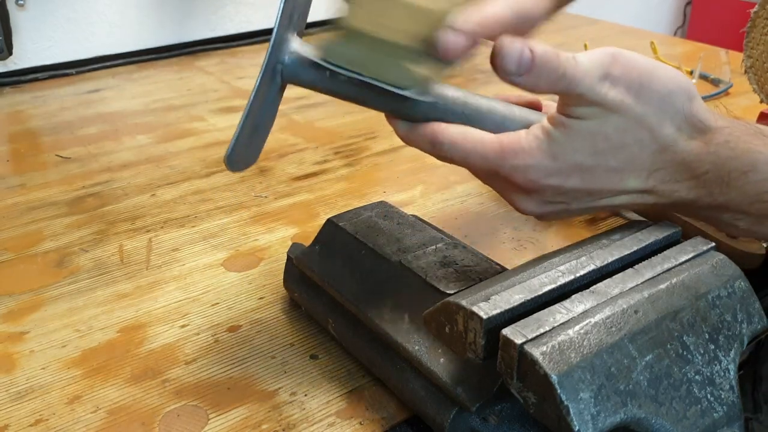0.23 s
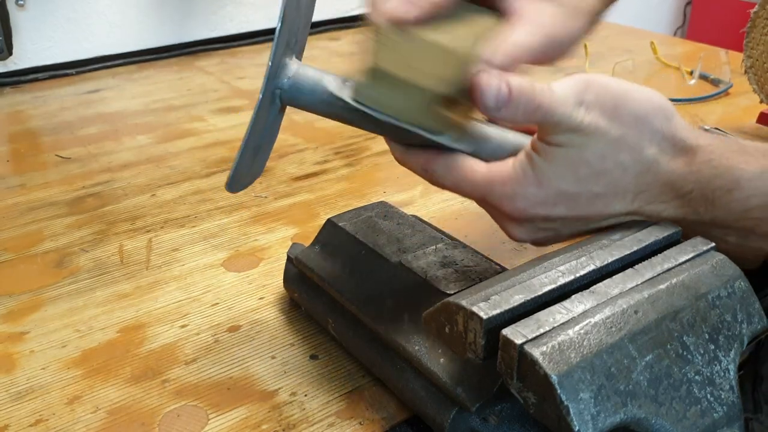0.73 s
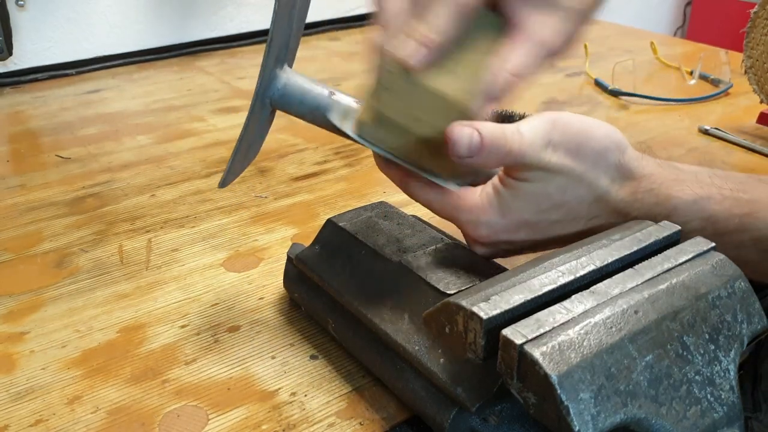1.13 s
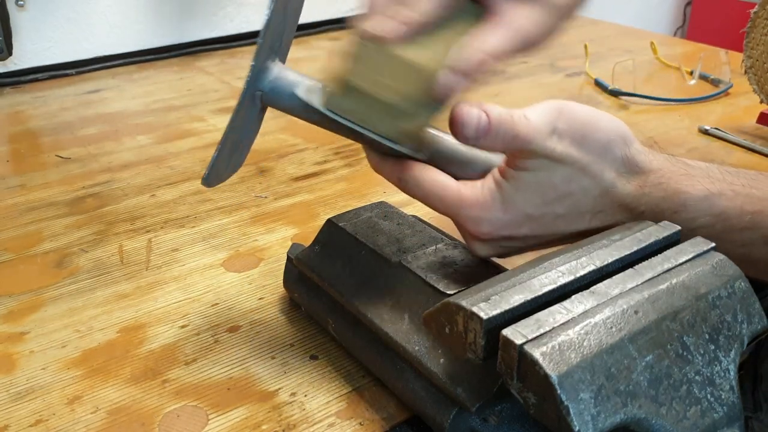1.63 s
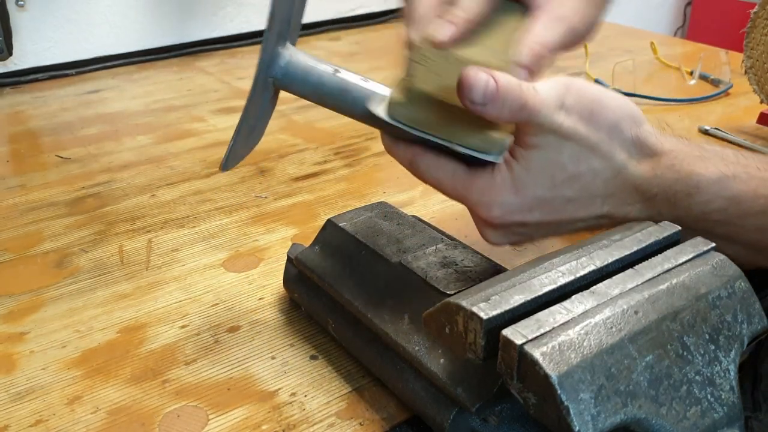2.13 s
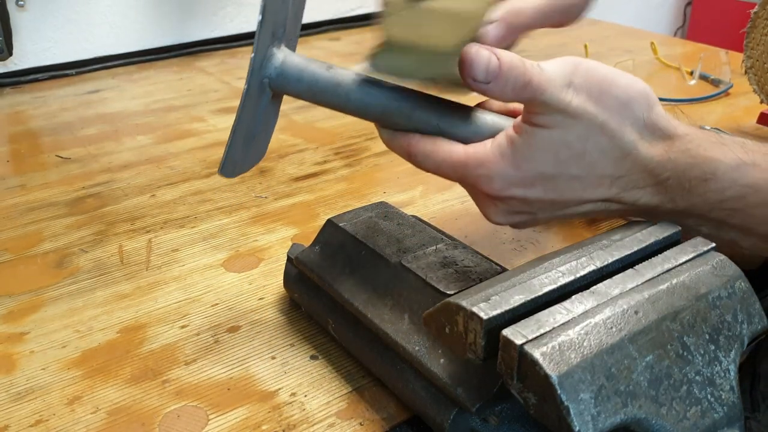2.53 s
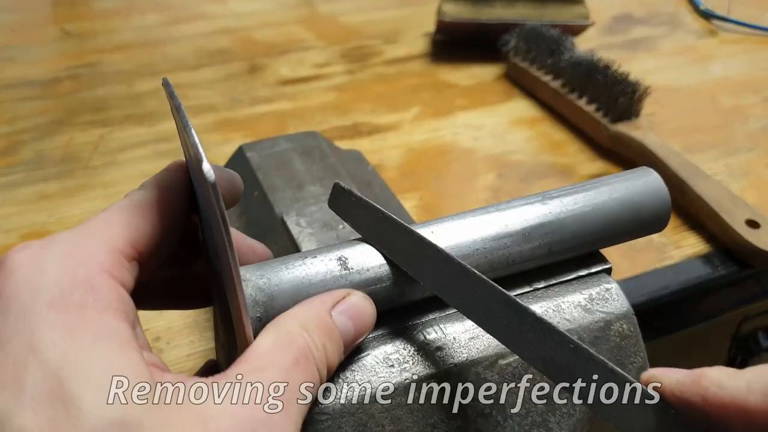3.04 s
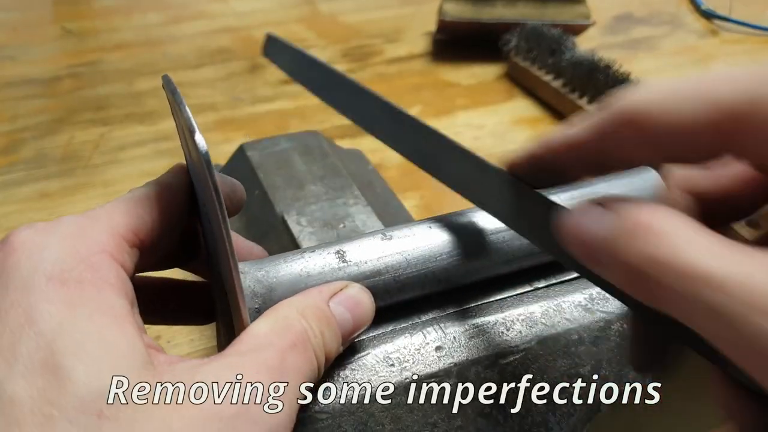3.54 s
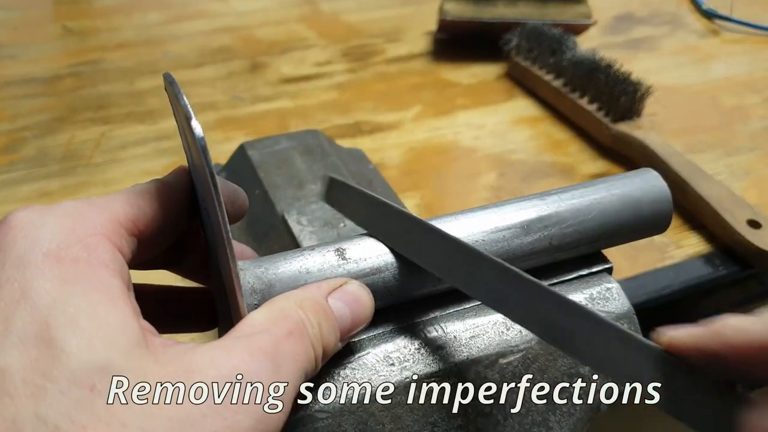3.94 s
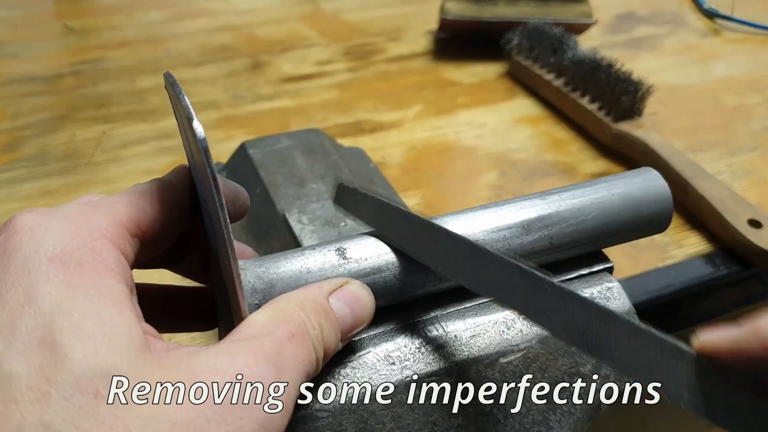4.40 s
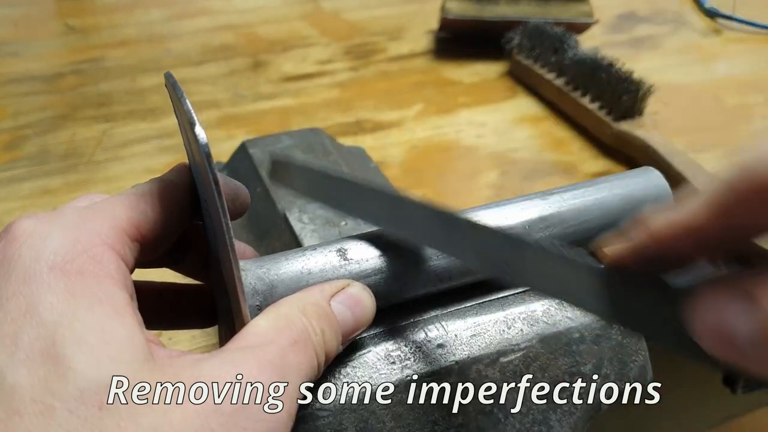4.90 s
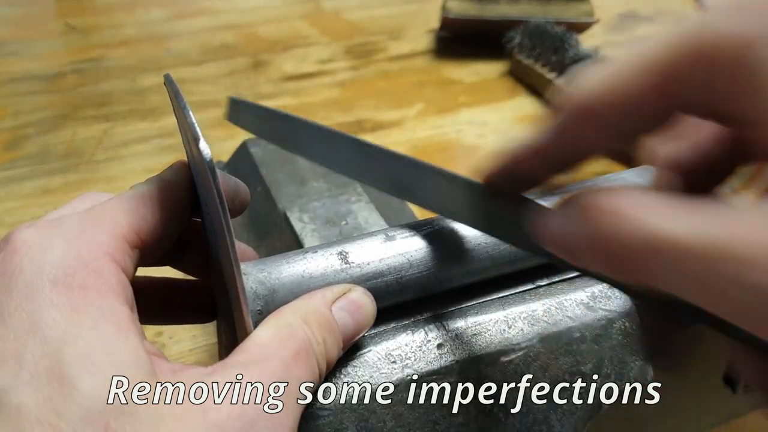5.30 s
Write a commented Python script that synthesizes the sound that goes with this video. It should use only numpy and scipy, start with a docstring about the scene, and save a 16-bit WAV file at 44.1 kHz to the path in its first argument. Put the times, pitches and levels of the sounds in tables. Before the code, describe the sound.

Close up in a small workshop, fast, even sanding strokes scratch along a steel tube with a bright, gritty hiss. After a very short pause, a hand file taps down on the tube and scrapes across it four times. The pushes have a metallic rasp and a short low hum, and irregular knocks between them carry through the vice and the bench.

```python
"""Quick to-and-fro sanding on a hand-held steel tube, then a file knocking, rasping and humming on it.
Grit on the sanding block strikes the tube in countless small impacts, while the hand damps its modes.
Then the tube lies on a vice: the file's teeth and blows force the steel, the vice and the bench into
vibration. The file's own low bending note hums late in a push and rings briefly after the opening and
closing knocks. A small workshop reverberates."""
import sys
import numpy as np
from scipy import signal
from scipy.fft import rfft, irfft, next_fast_len
from scipy.io import wavfile
from scipy.ndimage import uniform_filter1d

SR = 44100
rng = np.random.default_rng(int(sys.argv[2]) if len(sys.argv) > 2 else 0)


def put_to_file(sound):
    """Save the sound as 16-bit audio at rate SR, in the file named by the first command-line argument."""
    columns = np.atleast_2d(sound).T  # one column per channel
    safe = np.clip(columns, -1, 1)
    whole_steps = np.round(safe * 32767)
    wavfile.write(sys.argv[1], SR, whole_steps.astype(np.int16))


N = 245195
TIME_S = np.arange(N) / SR
FFT_SIZE = next_fast_len(N + SR)
HZ = np.fft.rfftfreq(FFT_SIZE, 1 / SR)

# The file lands, knocks or snags: start_s, bench_db, steel_above_bench_db, thud_hz
FILE_KNOCKS = [(2.738, -61.5, -23, 484), (2.782, -42, -35, 700), (2.853, -43.5, -19.5, 1440),
               (2.906, -47, -17, 1220), (3.113, -37, -6.5, 1320), (3.716, -42.5, -13, 1330),
               (3.77, -38.5, 4, 1250), (3.941, -45.5, -3.5, 760), (4.054, -43.5, -15, 1450),
               (4.151, -38, 6.5, 1330), (4.481, -40, -1, 1440), (4.717, -34.5, 6, 1215),
               (5.011, -36, 9.5, 1000), (5.095, -36.5, -12, 785), (5.187, -36, -11, 1600),
               (5.452, -34.5, 8.5, 1020)]


def gain_of(db):
    """Amplitude ratio of a level in decibels."""
    return 10 ** (np.asarray(db) / 20)


def unit_rms(x):
    """Normalisation to a mean power of 1."""
    return x / np.sqrt(np.mean(abs(x) ** 2) + 1e-20)


def curve_at(points, hz):
    """Interpolation along a logarithmic frequency axis."""
    point_hz, value = np.transpose(points)
    return np.interp(np.log(hz + 1), np.log(point_hz + 1), value)


def wander(cutoff_hz):
    """Low-passed noise: a slow random fluctuation of rms 1."""
    return unit_rms(signal.lfilter(*signal.butter(2, cutoff_hz / SR * 2), rng.standard_normal(N)))


def modal_response(modes, floor):
    """Resonance: modal peaks add in power over a broad floor, in a normalised minimum-phase response."""
    hz = abs(np.fft.fftfreq(16384, 1 / SR))
    power = gain_of(2 * curve_at(floor, hz))
    for centre_hz, width_hz, db in modes:
        power = power + gain_of(2 * db) / (1 + (2 * (hz - centre_hz) / width_hz) ** 2) ** 2
    log_spectrum = np.conj(signal.hilbert(np.log(power + 1e-12) / 2))
    ring = np.fft.ifft(np.exp(log_spectrum)).real
    return unit_rms(rfft(ring[:8192], FFT_SIZE))


def stereo_spectra(pair, correlation):
    """Partial coherence: two independent signals mix into correlated left and right spectra."""
    left, other = rfft(pair, FFT_SIZE)
    shared = np.clip(curve_at(correlation, HZ), 0, 1)
    return np.array([left, shared * left + np.sqrt(1 - shared ** 2) * other])


def micro_impacts(per_s, spread_db):
    """Shot noise: two independent streams of random clicks, a few much larger than the rest."""
    size = gain_of(spread_db * np.minimum(rng.exponential(1, (2, N)), 5))
    return unit_rms(size * rng.standard_normal((2, N)) * (rng.random((2, N)) < per_s / SR))


def moving_contact(x, depth_db, frames, bins):
    """Excitation depends on position: as the contact moves, patches of the spectrum swell and sink."""
    hz, _, spectra = signal.stft(x, SR, nperseg=512, noverlap=384)
    patches = rng.standard_normal(spectra.shape[1:])
    for _ in range(2):
        patches = uniform_filter1d(uniform_filter1d(patches, frames, axis=1), bins, axis=0)
    patches = unit_rms(patches) * np.minimum(hz / 600, 1)[:, None]  # the bass stays even
    coloured = signal.istft(spectra * gain_of(depth_db * patches), nperseg=512, noverlap=384)[1]
    return unit_rms(coloured[:, :N])


def force_pulses(times_s, levels_db, decay_s, rise_s=0.00058):
    """Impulsive excitation: envelopes of force that rise steeply and decay exponentially."""
    spikes, t = np.zeros(N), TIME_S[:600]
    spikes[np.round(np.asarray(times_s) * SR).astype(int)] = gain_of(levels_db)
    return signal.oaconvolve(spikes, np.exp(-t / decay_s) * (1 - np.exp(-t / rise_s)))[:N]


def sanding():
    """Friction noise grows with sliding speed: the grit scratches mid-stroke and fades at each turn."""
    # Strokes of the block: turn_s, level_db
    strokes = [(-0.02, -34.5), (0.094, -35.5), (0.203, -34.5), (0.308, -34), (0.414, -32), (0.507, -34.5),
               (0.619, -34.5), (0.721, -35.5), (0.815, -38.5), (0.914, -37.5), (1.014, -36), (1.109, -36.5),
               (1.214, -35.5), (1.31, -36.5), (1.422, -36), (1.516, -35.5), (1.614, -37), (1.708, -36.5),
               (1.801, -36.5), (1.893, -36.5), (1.998, -37), (2.092, -36.0), (2.187, -35.5), (2.292, -36),
               (2.388, -36.5), (2.489, -45)]
    # The paper catches on the tube: start_s, level_db
    catches = [(0.0551, -25)]
    # Spectrum of the scratching: frequency_hz, density_db
    grit_spectrum = [(150, -66.5), (250, -33.5), (555, -21), (616, -22), (1420, -14), (2650, -8),
                     (5210, -4.5), (7490, -5), (8910, -9), (12000, -5), (15800, -10)]
    # Brightness of the grit: time_s, treble_tilt_db
    brightness = [(0.1, 1.5), (0.55, 8), (0.85, 2.5), (1.35, 8), (1.75, 3.5), (2.4, 1.5)]
    # Likeness of left and right: frequency_hz, correlation
    coherence = [(300, 0.2), (1200, 0.23), (5000, 0.33), (8000, 0.15)]
    # Tube mode damped by the hand: pitch_hz, width_hz, level_db
    damped_mode = [(7570, 430, -4)]
    # The one mode that still rings: pitch_hz, width_hz, level_db
    ringing_mode = [(2695, 23, 8.5)]
    # That ring grows as the grip loosens: time_s, level_re_grit_db
    grip = [(0, -28), (1.7, -22), (2.2, -20.5)]
    end_s, speed_floor, treble_hz = 2.565, 0.13, 7500
    turn_s, level_db = np.transpose(strokes)
    t, edges = TIME_S, np.append(turn_s, end_s)
    stroke = np.clip(np.searchsorted(edges, t) - 1, 0, len(turn_s) - 1)
    progress = np.clip((t - edges[stroke]) / np.diff(edges)[stroke], 0, 1)
    swing = abs(np.sin(np.pi * progress ** 0.85)) ** 0.77  # fastest a little before the middle
    speed = speed_floor * (t < end_s) + swing
    drive = uniform_filter1d(speed * gain_of(level_db[stroke] + 0.91 * wander(33)), 200)
    drive += force_pulses(*np.transpose(catches), decay_s=0.0062)
    impacts = micro_impacts(per_s=20000, spread_db=1.7)
    grit = drive * moving_contact(impacts, depth_db=1.8, frames=10, bins=5)
    tilt = gain_of(np.interp(t, *np.transpose(brightness)) / 2)
    treble = signal.sosfilt(signal.butter(2, treble_hz, "high", fs=SR, output="sos"), grit)
    tilted = treble * tilt + (grit - treble) / tilt
    scratch = stereo_spectra(tilted, coherence) * modal_response(damped_mode, grit_spectrum)
    ring_drive = grit * gain_of(np.interp(t, *np.transpose(grip)))
    ring = stereo_spectra(ring_drive, coherence) * modal_response(ringing_mode, [(20, -60), (20000, -60)])
    return irfft(scratch + ring, FFT_SIZE)[:, :N]


def reverberation(x):
    """Reflections of random sign decay exponentially, each frequency band at its own rate."""
    # Reverberation time of the workshop: frequency_hz, t60_s
    decay_times = [(300, 0.32), (4000, 0.23), (12000, 0.23)]
    echoes = np.zeros((2, SR // 2))
    slots = np.arange(200, SR // 2 - 20, 20)
    arrivals = slots + rng.integers(0, 20, (2, len(slots)))
    np.put_along_axis(echoes, arrivals, rng.choice([-1., 1.], arrivals.shape), 1)
    hz, t, spectra = signal.stft(echoes, SR, nperseg=256)
    decay = gain_of(-60 * t / curve_at(decay_times, hz)[:, None])
    tail = signal.istft(spectra * decay, SR, nperseg=256)[1]
    return signal.fftconvolve(x, tail / np.linalg.norm(tail[0]), axes=1)[:, :N]


def room_tone():
    """Ambient noise: a low wash, coherent between left and right in the bass, and a faint hum."""
    # Spectrum of the quiet room: frequency_hz, density_db
    spectrum = [(25, -6), (60, 3), (110, 1.5), (160, -6.5), (280, -1.5), (1270, -14.5), (3640, -30),
                (15800, -27.5)]
    wash_db, rise_db, hum_hz, hum_db = -75.5, 6.1, 207, -82
    noise = stereo_spectra(rng.standard_normal((2, N)), [(100, 0.9), (300, 0.23), (700, 0.1)])
    wash = unit_rms(irfft(noise * gain_of(curve_at(spectrum, HZ)), FFT_SIZE)[:, :N])
    hum = np.sin(2 * np.pi * hum_hz * TIME_S + 0.53 * wander(5))
    on_vice = TIME_S > FILE_KNOCKS[0][0]  # the wash is louder from the first knock on
    return gain_of(wash_db + rise_db * on_vice) * wash + gain_of(hum_db) * hum


def filing():
    """Forced vibration: uneven tooth bites and single blows drive the modes of steel, vice and bench."""
    # Pushes and light drags: start_s, top_s, lift_s, steel_db, bench_above_steel_db, swell_db
    pushes = [(2.924, 2.962, 2.995, -78, 23.5, 6), (3.07, 3.12, 3.11, -57.5, 5.5, 24),
              (3.148, 3.381, 3.424, -40, 0.5, 21), (3.648, 3.708, 3.712, -67, 7, 20),
              (3.914, 4.149, 4.135, -38, 0, 26.5), (4.537, 4.702, 4.73, -33.5, 0.5, 24.5),
              (5.077, 5.202, 5.25, -37, -1.5, 14.5)]
    # Modes of file and tube: pitch_hz, width_hz, level_db
    steel_modes = [(2493, 400, -2.5), (3260, 130, -2.5), (4020, 170, -2), (4137, 82, 13), (4245, 440, 5),
                   (4700, 49, 3), (4817, 85, 7.5), (5920, 650, -6), (7860, 90, -12), (8210, 89, 5.5),
                   (9670, 76, 9), (9700, 410, -2.5), (12620, 45, -14)]
    # Response between those modes: frequency_hz, density_db
    steel_floor = [(1200, -79), (2000, -11.5), (3500, -10.5), (4400, -4.5), (6700, -21), (8000, -1),
                   (9000, -20), (10000, -15), (13000, -13), (13700, -34), (15800, -32)]
    # Modes of vice and bench: pitch_hz, width_hz, level_db
    bench_modes = [(144, 39, -0.5), (185.2, 5.3, -1.5), (344.8, 13, 3.5), (386, 8.1, 2.5), (458, 84, -8.5),
                   (647, 136, -4), (775, 75, -3.5), (872, 75, -2.5), (943.3, 25, 2), (1237, 118, -5),
                   (1430, 100, -4), (1617, 39, -8.5), (1905, 23, -9.5)]
    # Response between those modes: frequency_hz, density_db
    bench_floor = [(25, -49), (50, -10), (100, -27.5), (300, -2.5), (900, -12.5), (1500, -13),
                   (2500, -31.5), (5000, -45.5)]
    # Likeness of left and right: frequency_hz, correlation
    coherence = [(300, 1), (700, 0.28), (1500, 0.41), (5000, 0.33), (12000, 1)]
    bite_s, ease_db_per_s, steel_lift_db_per_s, bench_lift_db_per_s = 0.022, 69, 554, 342
    chatter_steel_db, chatter_bench_db, settle_db_per_s = -14, -6, 233
    t = TIME_S
    steel, bench = np.zeros((2, N))
    for start_s, top_s, lift_s, steel_db, bench_above_db, swell_db in pushes:
        bite = np.clip((t - start_s) / bite_s + 1, 0, 1) ** 2
        to_go = np.clip((top_s - t) / (top_s - start_s), 0, 1)
        swell = gain_of(steel_db - swell_db * to_go ** 1.94)  # the level climbs fastest early on
        push = bite * swell * gain_of(-ease_db_per_s * np.maximum(t - top_s, 0))
        lifted_s = np.maximum(t - lift_s, 0)
        steel += push * gain_of(-steel_lift_db_per_s * lifted_s)
        bench += push * gain_of(bench_above_db - bench_lift_db_per_s * lifted_s)
    for at_s, db, above_db, _ in FILE_KNOCKS:  # after each knock the file chatters and settles
        chatter = (t > at_s) * gain_of(db - settle_db_per_s * abs(t - at_s))
        steel += chatter * gain_of(above_db + chatter_steel_db)
        bench += chatter * gain_of(chatter_bench_db)
    teeth = moving_contact(micro_impacts(per_s=9000, spread_db=1.8), depth_db=2.86, frames=14, bins=3)
    teeth *= gain_of(1.87 * wander(95))
    knock_s, knock_db, steel_above_db, thud_hz = np.transpose(FILE_KNOCKS)
    blow = rng.standard_normal((2, N))
    steel = steel * teeth + blow * force_pulses(knock_s, knock_db + steel_above_db, decay_s=0.0037)
    bench = bench * teeth
    for at_s, db, hz in zip(knock_s, knock_db, thud_hz):  # each blow favours the modes near its pitch
        span = slice(round(at_s * SR), round(at_s * SR) + 3000)
        thud = (blow * force_pulses([at_s], [db], decay_s=0.0093))[:, span]
        bench[:, span] += 0.31 * thud + 2.73 * signal.lfilter(*signal.iirpeak(hz, Q=4.5, fs=SR), thud)
    ring = stereo_spectra(steel, coherence) * modal_response(steel_modes, steel_floor)
    shake = stereo_spectra(bench, coherence) * modal_response(bench_modes, bench_floor)
    return irfft(ring + shake, FFT_SIZE)[:, :N]


def file_singing():
    """Bending resonance: a low note hums late in a push and rings after the opening and closing knocks."""
    # Swells of the bending note: top_s, level_db, fade_s
    swells = [(2.802, -49.5, 0.028), (3.279, -42.5, 0.035), (3.4, -38, 0.022), (4.09, -41.5, 0.05),
              (4.174, -32, 0.053), (4.655, -42.5, 0.013), (4.731, -32, 0.049), (5.225, -36, 0.014),
              (5.262, -31.5, .045), (5.49, -53, 0.064)]
    bending_hz, rise_share = 336, 0.48
    power = np.zeros(N)
    for top_s, level_db, fade_s in swells:
        width_s = np.where(TIME_S < top_s, rise_share * fade_s, fade_s)
        power += gain_of(2 * level_db) * np.exp(-((TIME_S - top_s) / width_s) ** 2)
    note = np.sin(2 * np.pi * bending_hz * TIME_S + 0.43 * wander(12))
    return np.sqrt(2 * power) * note * gain_of(2.3 * wander(29))


def scene():
    """Superposition: sanding and filing with their reverberation, the file's note and the room tone."""
    sanded, filed = sanding(), filing()
    reflected = gain_of(-6) * reverberation(sanded) + gain_of(-3) * reverberation(filed)
    return sanded + filed + reflected + file_singing() + room_tone()


def record(dry):
    """Level and time differences: of two band-limited microphone ports, the left is louder and earlier."""
    # Excess of the left port over the right: frequency_hz, level_db
    left_excess = [(60, 7.5), (180, 1), (550, 8.5), (1650, 5), (4970, 3), (15000, 9.5)]
    right_delay_s, low_cut_hz, high_cut_hz = 9e-5, 38, 15900
    left_gain = gain_of(curve_at(left_excess, HZ) / 2)
    ports = np.array([left_gain, np.exp(-2j * np.pi * HZ * right_delay_s) / left_gain])
    high_pass = 1 / (1 + (low_cut_hz / (HZ + 1)) ** 4)
    heard = irfft(ports * high_pass * rfft(dry, FFT_SIZE), FFT_SIZE)[:, :N]
    low_pass = signal.firwin(511, high_cut_hz, window=("kaiser", 9), fs=SR)
    return signal.oaconvolve(heard, low_pass[None], "same")


dry = scene()
out = record(dry)
put_to_file(out)
```